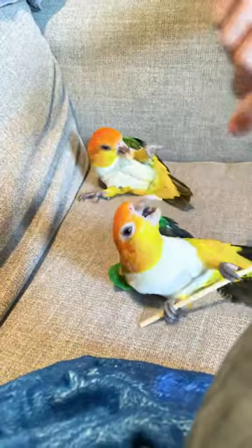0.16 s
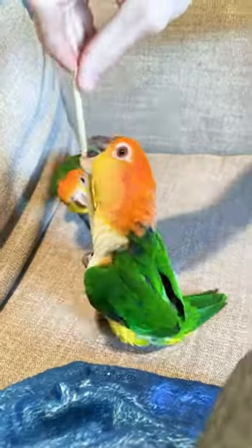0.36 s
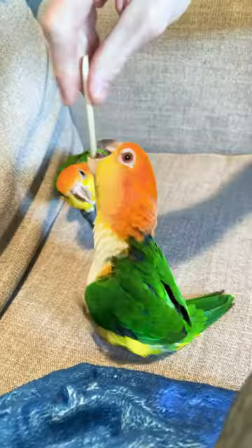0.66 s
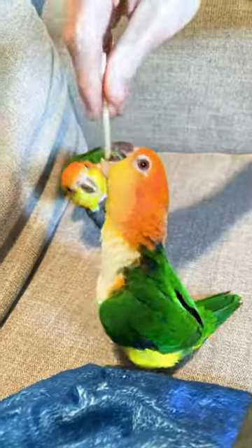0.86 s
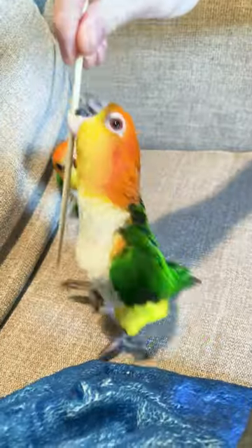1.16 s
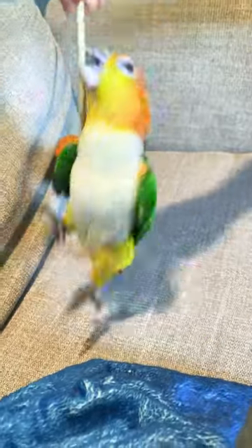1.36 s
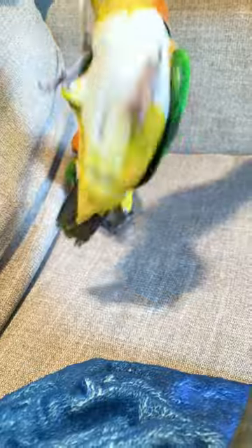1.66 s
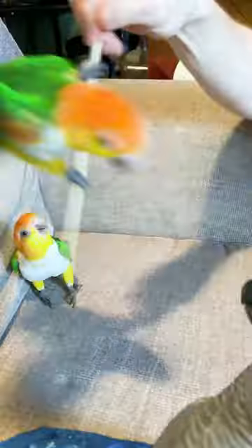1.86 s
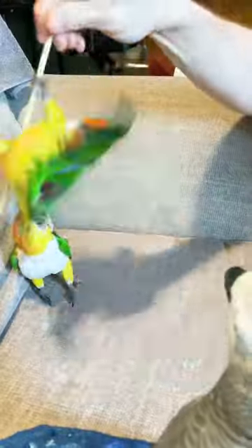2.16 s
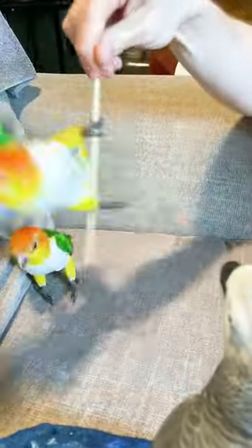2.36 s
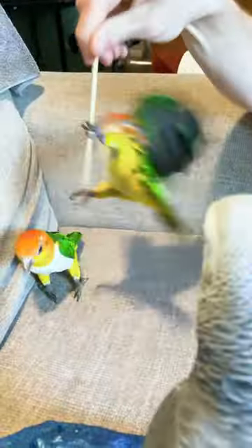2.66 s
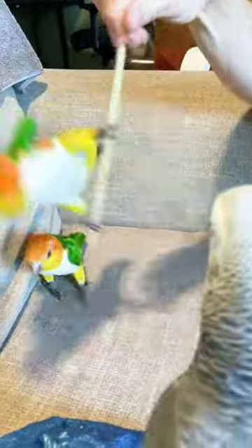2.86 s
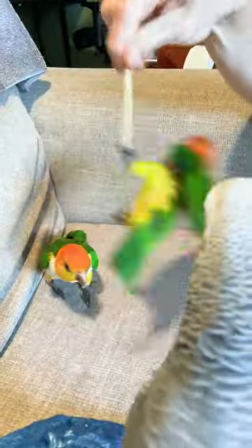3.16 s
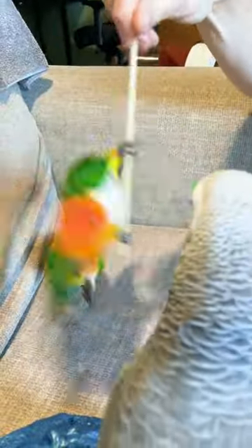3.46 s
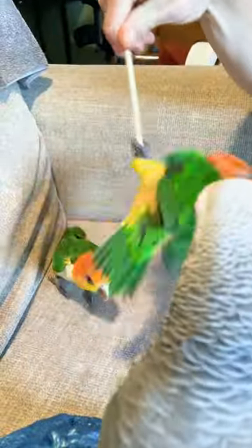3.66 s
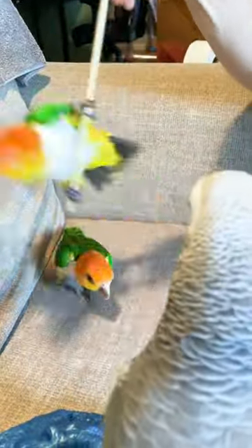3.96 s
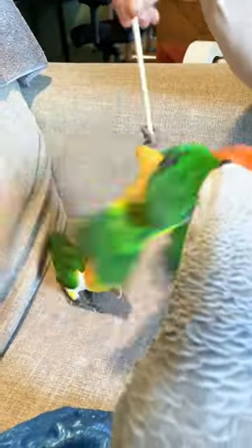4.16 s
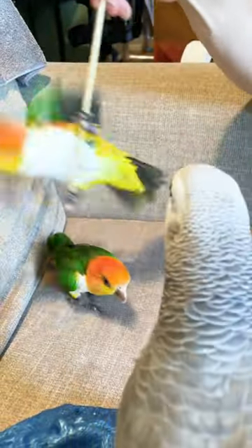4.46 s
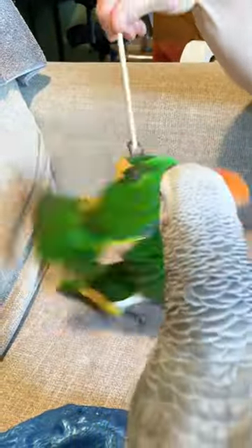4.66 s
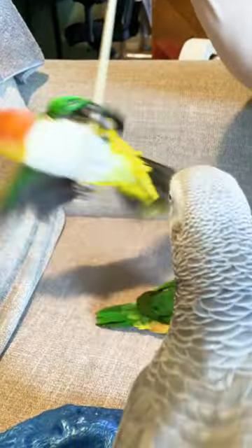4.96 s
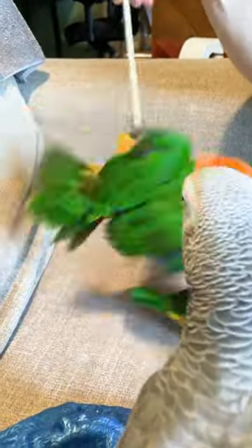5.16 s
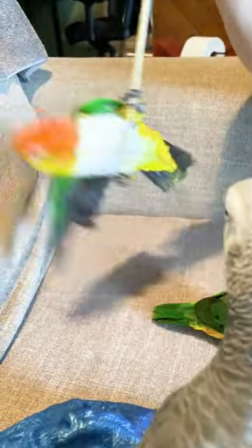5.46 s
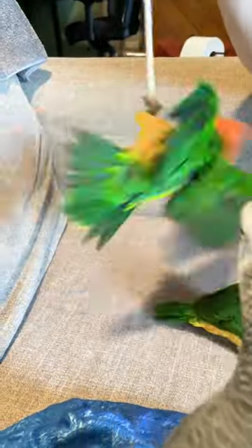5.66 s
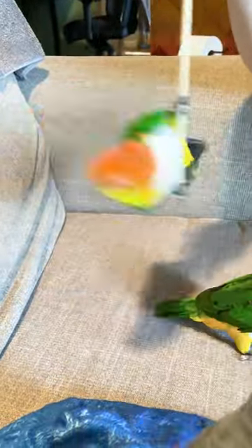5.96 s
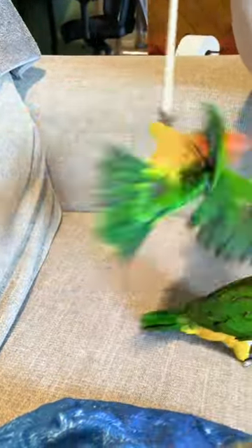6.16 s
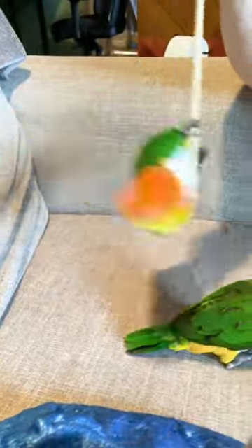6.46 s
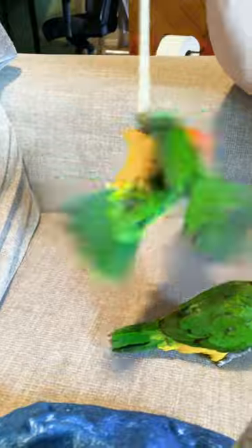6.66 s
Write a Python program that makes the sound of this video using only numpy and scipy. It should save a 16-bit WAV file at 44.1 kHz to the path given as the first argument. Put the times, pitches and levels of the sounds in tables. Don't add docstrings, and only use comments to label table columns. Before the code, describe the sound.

Close stereo pickup of a small parrot playing with a thin wooden stick on a cushioned sofa. Sparse rustles, a faint peep, claw scratches and tiny clicks come first. A hurried flurry of flapping follows, crowded with bright beak snaps, woody knocks, dull cushion thuds and wind buffeting. It thins into irregular feathery whooshes as the bird swings, with a few ticks, over quiet room hum and a very faint thin whine.

```python
import sys
import numpy as np
from scipy import signal
from scipy.fft import rfft, irfft, next_fast_len
from scipy.io import wavfile
from scipy.ndimage import uniform_filter1d

SR = 44100
rng = np.random.default_rng(int(sys.argv[2]) if len(sys.argv) > 2 else 0)


def master_out(mix):
    frames = np.transpose(np.atleast_2d(mix))
    ceiling = np.clip(frames, -1, 1)
    pcm = np.round(ceiling * 32767).astype(np.int16)
    wavfile.write(sys.argv[1], SR, pcm)


def nominal_scale(level):
    x = np.asarray(level, float) / 20
    return 10 ** x


N = 300762
T_S = np.arange(N) / SR
SIZE = next_fast_len(N + SR // 4)
BIN_HZ = np.maximum(np.arange(SIZE // 2 + 1) * SR / SIZE, 1)

# peak t/s, level/dB,
# swell/s, fade/s, dullness/dB
FIDGETS = [(.095, -60, 0.17, 0.086, 2), (.17, -74.5, 0.11, .1, 6), (.25, -70.5, 0.12, 0.012, 10),
           (.36, -76, 0.24, 0.44, -22), (0.498, -50.5, 0.0072, 0.0098, 3.5),
           (0.578, -63, 0.055, 0.073, 6.5), (.8, -76, 0.99, 0.72, -1), (.968, -62, 0.017, 0.081, -2),
           (1.058, -62.5, 0.031, 0.49, -7), (1.17, -82, .15, 0.15, 3), (1.3, -77, 0.18, .12, 8),
           (1.385, -68.5, 0.069, .03, 1), (1.592, -63.5, 0.024, 0.14, -1), (1.66, -70, .06, .04, 8),
           (1.72, -65, 0.059, 0.073, 2.5), (1.85, -68.5, .1, 0.07, 3), (4.861, -67.5, 0.43, 0.16, 1)]
# peak t/s, level/dB, swell/s, fade/s, dullness/dB
FLAPS = [(1.893, -48.5, 0.0065, 0.16, 2), (1.945, -41.5, 0.049, 0.062, 0.5), (2.035, -44, 0.11, 0.14, -1),
         (2.1, -45, 0.023, 0.21, 0.5), (2.195, -45, 0.02, 0.068, 5.5), (2.264, -42, 0.033, 0.024, 1),
         (2.3, -49, 0.14, 0.23, 2.5), (2.35, -53, .03, 0.088, 5), (2.425, -46, 0.037, 0.17, 0),
         (2.519, -42, 0.11, 0.13, 2), (2.6, -46.5, 0.07, 0.15, -2), (2.673, -47, 0.026, 0.028, 4),
         (2.735, -47.5, 0.08, 0.11, 1.5), (2.86, -54, 0.22, 0.09, 2.5), (2.945, -51, 0.064, 0.1, -2.5),
         (3.026, -49.5, 0.04, 0.06, 4), (3.09, -53, .1, 0.089, 0.5), (3.14, -65, .03, 0.068, -3)]
# peak t/s, level/dB, swell/s, fade/s, dullness/dB
SWINGS = [(3.324, -55, 0.024, 0.036, 6.5), (3.37, -55.5, 0.099, 0.19, 0.5), (3.5, -77.5, 0.053, 0.27, 13.5),
          (3.68, -68.5, 0.11, 0.26, 4), (3.875, -61.5, 0.086, 0.12, 1), (3.93, -58, 0.1, 0.34, 0.5),
          (4.033, -53.5, 0.028, 0.05, -4.5), (4.1, -63.5, 0.27, .15, 3), (4.155, -57.5, 0.046, 0.065, 0),
          (4.245, -60.5, 0.031, 0.12, 0.5), (4.285, -60.5, 0.094, 0.085, -2),
          (4.425, -51.5, 0.027, 0.2, -3), (4.496, -51.5, 0.094, 0.035, 4.5), (4.56, -63, 0.13, 0.083, 0),
          (4.605, -56, 0.038, .1, -16), (4.64, -55, 0.073, 0.091, 1.5), (4.746, -46.5, 0.079, 0.053, -6.5),
          (4.949, -50.5, 0.033, 0.1, 0), (5.0, -63, .06, 0.1, 2), (5.15, -58.5, 0.086, 0.1, 4.5),
          (5.185, -54.5, 0.061, 0.12, -2.5), (5.24, -55.5, 0.12, .05, -1.5),
          (5.355, -63.5, 0.077, 0.054, 2.5), (5.408, -61, 0.041, 0.05, 5), (5.5, -76, .15, .12, 2),
          (5.595, -58, 0.021, 0.076, 2), (5.662, -48.5, 0.083, 0.082, 0), (5.775, -56, 0.11, 0.096, 2),
          (6.083, -58.5, 0.032, 0.098, 7), (6.147, -47, 0.066, 0.098, -3), (6.281, -63, 0.47, 0.35, 2.5),
          (6.575, -62, 0.025, 0.13, 6), (6.646, -45, 0.071, 0.057, 0.5), (6.771, -49, 0.1, 0.074, 3),
          (6.82, -52, 0.021, 0.042, 7.5)]
# f/Hz, density/dB per Hz
FEATHER = [(900, -5), (1500, -4.5), (1950, -3.5), (2300, -5), (2800, -4), (3500, -4.5), (5000, -2),
           (6400, 1), (8000, 0.5), (10000, 8.5), (11300, 6), (12300, -5.5), (13500, 7.5), (15500, -25)]
# start t/s, end t/s, bright barbs level/dB, dull barbs level/dB
STROKES = [
    (1.069, 1.085, -46, -66),
    (2.007, 2.023, -38.5, -41),
    (2.229, 2.244, -28, -36.5),
    (2.311, 2.317, -37, -37),
    (2.319, 2.327, -25, -34.5),
    (2.436, 2.471, -39.5, -42.5),
    (2.828, 2.835, -28.5, -41.5),
    (3.386, 3.413, -46, -52),
    (3.937, 3.967, -45, -52.5),
    (6.728, 6.755, -40.5, -54),
]
# start t/s, end t/s, level/dB, start f/Hz, end f/Hz
WHISTLES = [
    (2.234, 2.244, -29.5, 2050, 2700),
    (2.316, 2.327, -27, 2140, 2820),
    (2.83, 2.833, -32, 2190, 2680),
]
# t/s, peak level/dB, T60/s
BEAK_CLICKS = [(.311, -55, 0.0083), (0.436, -54, .005), (0.56, -48, 0.03), (0.617, -56, .009),
               (.961, -50, .004), (0.9662, -35, 0.0033), (0.984, -48, 0.013), (1.051, -41.5, 0.0061),
               (1.064, -41, .006), (1.58, -55, 0.014), (1.602, -56, 0.0069), (1.82, -59, .01),
               (1.888, -33, 0.0071), (1.92, -32, .01), (1.9477, -41, .01), (2.017, -31, 0.0091),
               (2.0974, -44, .01), (2.198, -28.5, .006), (2.3332, -18.5, 0.0064), (2.3993, -17, 0.005),
               (2.4494, -27, 0.025), (2.613, -30, 0.0098), (2.6648, -31.5, 0.029), (2.713, -41, 0.011),
               (2.7344, -48, 0.016), (2.766, -31.5, 0.013), (2.841, -40, .005), (2.921, -45, .01),
               (2.94, -44, .01), (3.0267, -48, .01), (3.0635, -46, 0.0089), (3.127, -26.5, 0.0058),
               (3.317, -28, 0.0076), (3.847, -43, 0.0088), (3.879, -43.5, .008), (4.405, -45, 0.0088),
               (4.4243, -49, 0.0052), (4.467, -45, .01), (4.6204, -49, .011), (4.722, -46, 0.011),
               (4.9421, -54, .008), (4.9476, -43, 0.0071), (5.628, -44, 0.012), (5.6976, -46, 0.0098),
               (6.7315, -43, .008), (6.7461, -41, 0.0058), (6.751, -39, .011), (6.786, -32, 0.023),
               (6.8154, -35, 0.057)]
# t/s, peak level/dB, ring f/Hz
WOOD_TICKS = [(0.495, -45, 2410), (.966, -53, 4260), (.984, -50, 4270), (1.051, -57, 4000),
              (1.377, -44.5, 1510), (1.6147, -45.5, 8100), (1.686, -47, 1410), (1.6865, -50, 6500),
              (1.704, -34, 6900), (1.7046, -39.5, 2380), (1.821, -60, 2000), (2.188, -46, 2950),
              (2.191, -30, 3280), (2.1987, -30, 2480), (2.2452, -20.5, 3280), (2.401, -36, 6200),
              (2.523, -30.5, 2570), (3.393, -42.5, 6060), (3.404, -38, 6200), (3.952, -34, 6200),
              (4.601, -45, 7000), (4.609, -48, 6540), (4.634, -47, 1510), (4.642, -46, 1970),
              (4.708, -49, 2600), (4.724, -53, 1690), (5.6652, -38.5, 2300), (6.074, -47, 1800),
              (6.525, -61, 5730), (6.572, -52, 2600)]
# t/s, peak level/dB, ring f/Hz
KNOCKS = [(.44, -58, 300), (.5, -56, 300), (1.823, -52, 790), (1.828, -49, 460), (2.017, -52, 540),
          (2.199, -34, 1310), (2.23, -30, 2530), (1.646, -49.5, 1110), (2.447, -42, 710), (2.453, -55, 510),
          (2.46, -40, 705), (2.4675, -35, 1110), (2.47, -33, 442), (2.507, -40, 497), (2.522, -51, 496),
          (2.534, -32.5, 325), (2.548, -50, 603), (2.588, -44, 400), (2.607, -41, 348), (2.665, -34.5, 730),
          (2.676, -41, 470), (2.687, -42, 380), (2.734, -45, 2070), (3.388, -53, 1410), (3.955, -49, 1050),
          (3.961, -47, 1090), (4.041, -43.5, 660), (4.046, -45, 328), (4.479, -50, 1090),
          (4.643, -38.5, 496), (4.71, -48, 480), (4.7245, -32.5, 600), (4.727, -44, 560), (4.771, -42, 418),
          (4.925, -67, 890), (5.666, -46, 448)]
# t/s, peak level/dB, ring f/Hz, initial pitch excess/share
THUDS = [(0.437, -36, 84, 1.6), (0.499, -33, 77, 1.46), (1.07, -38.5, 188, 0.23), (1.828, -44.5, 110, 0.47),
         (1.892, -30.5, 54.5, .1), (1.907, -39, 44.7, .3), (1.93, -33, 60.4, 0.086), (2.016, -37, 65.6, .1),
         (2.102, -37, 55, 0.087), (2.197, -38.5, 85, 0.3), (2.235, -37.5, 255, 0.28),
         (2.248, -38, 55, 0.27), (2.326, -31, 80.6, 0.48), (2.451, -35, 220, 0.36),
         (2.469, -27, 72.4, 0.45), (2.4787, -36, 72, .1), (2.494, -35, 70.6, .1), (2.508, -37.5, 170, .3),
         (2.523, -35, 55.6, 0.4), (2.541, -36, 148, 0.42), (2.559, -46, 201, .3), (2.577, -39.5, 118, 0.25),
         (2.625, -47, 160, 0.37), (2.604, -42.5, 64, 0.64), (2.834, -35.5, 106, 0.66),
         (2.954, -34.5, 54, .1), (4.049, -40, 80, 1.35), (4.646, -38.5, 110, 1.2), (4.728, -39, 104, 0.96),
         (4.786, -38.5, 80.5, .1), (6.81, -41.5, 80.5, .3)]
# start t/s, end t/s, level/dB, centre f/Hz
SCRATCHES = [
    (0.557, 0.57, -51.5, 9450),
    (0.609, 0.624, -53.5, 9800),
    (1.065, 1.078, -37, 11000),
    (1.582, 1.595, -53.5, 9600),
    (1.59, 1.688, -60, 8600),
    (2.39, 2.42, -39, 10900),
]
# t/s, f/Hz, level/dB
PEEP = [(.068, 1433, -90), (.08, 1420, -62), (.1, 1386, -52), (.109, 1380, -58), (.122, 1320, -51),
        (.138, 1270, -55), (.146, 1270, -70)]
# peak t/s, gust level/dB, cloth flap level/dB, fade/s
PUSHES = [(.25, -47, -75, 0.41), (0.512, -48, -72, 0.03), (1.098, -47.5, -67, 0.17),
          (1.827, -67, -62.5, 0.046), (1.911, -40.5, -62, 0.13), (2.033, -32.5, -55, 0.073),
          (2.125, -31.5, -49, 0.051), (2.244, -32.5, -49, 0.045), (2.33, -37.5, -50, 0.023),
          (2.462, -51, -41, 0.04), (2.484, -37, -56, 0.086), (2.534, -38, -50, 0.085),
          (2.612, -34, -56, 0.021), (2.709, -44.5, -61, 0.23), (3.033, -41.5, -62, 0.25),
          (4.08, -46.5, -71.5, 0.28), (4.649, -66, -65, 0.72), (4.749, -39, -65, 0.09),
          (5.248, -49, -66, 0.4), (5.676, -52.5, -85, 0.24), (6.146, -55.5, -76, 0.62),
          (6.65, -51, -73, 0.25)]
# t/s, buffet level/dB, flutter level/dB
CROSSWIND = [(2.635, -75, -77), (2.652, -40, -44), (2.668, -45, -54), (2.685, -42, -45), (2.715, -37, -74),
             (2.8, -55, -70), (2.9, -81, -80), (3.1, -94, -92)]
# f/Hz, density/dB per Hz
ROOM = [(20, -12), (45, -2), (85, 3), (160, -5), (300, -9.5), (600, -21), (1200, -28.5), (1900, -40),
        (4000, -47.5), (9000, -54.5), (11000, -48), (12500, -50), (14500, -41)]
# f/Hz, width/Hz, level/dB
HUM = [
    (72, 69, -65.5),
    (218, 13, -59.5),
    (356, 6, -70),
]
FAR_RUSTLE = 5.93, .14, -76
# f/Hz, lead/rad
PORT_LEAD = [(1500, 0), (3000, .25), (4100, .9), (4800, 2.9), (5400, 5.4), (5800, 6.2), (6200, 6.4),
             (8400, 9.2), (8800, 9.42), (9700, 9.45), (11900, 12.57), (20000, 12.57)]
# f/Hz, level/dB
PORT_TILT = [(60, 1.1), (500, 2.2), (1200, -.5), (1800, 0), (2500, 2), (3300, 0), (4700, -3.5), (5700, 0),
             (14000, 0)]
# f/Hz, scattered level/dB
NEAR_SCATTER = [(100, -20), (300, -12), (700, -4), (1400, -18), (1900, -24), (2700, -7), (4100, -5),
                (4900, -3), (5950, -22), (7000, -7), (8100, -8), (8700, -13), (9600, -15), (10300, -12),
                (11500, -10), (12100, -17)]
# f/Hz, scattered level/dB
SIDE_SCATTER = [(100, -12), (800, -7), (1900, -22), (4800, -7), (5950, -20), (8000, -9), (9300, -17),
                (11000, -11), (13000, -16)]
# f/Hz, scattered level/dB
ROOM_SCATTER = [(100, -13), (300, -10), (800, -1), (1400, -2), (1850, -8), (3000, -2), (5000, -3),
                (5950, -16), (7500, -6), (8700, -16), (9600, -18), (10500, -10), (12100, -30)]
# f/Hz, level/dB
MICROPHONE = [(9000, -2), (11600, -3), (12400, -9.5), (13400, -17), (14500, -41), (16000, -26)]
# treble level/dB, top f/Hz
KEPT_TOP = [(-80, 13500), (-68, 11800), (-56, 12000), (-46, 13400), (-38, 14600)]

SWELL_BEND, FADE_BEND, SETTLED_DB = 1.39, 1.034, -90.5
SAG_CYCLES = 0.62
STICK_OVERTONE = 2.82


def rms_one(x):
    return x / np.sqrt(np.mean(x ** 2) + 1e-20)


def in_time(rows):
    s, *columns = np.transpose(rows)
    return [np.interp(T_S, s, c) for c in columns]


def at_hz(points):
    hz, value = np.transpose(points)
    return np.interp(np.log(BIN_HZ), np.log(np.maximum(hz, 1)), value)


def colour(x, gain):
    return irfft(rfft(x, SIZE) * gain, SIZE)[..., :N]


def band(x, low_hz, high_hz):
    return signal.sosfilt(signal.butter(2, [low_hz, high_hz], "band", fs=SR, output="sos"), x)


def drift(rate_hz):
    r = np.exp(-80 * np.pi * rate_hz / SR)
    slow = signal.lfilter([1], [1, -2 * r, r * r], rng.standard_normal(N // 40 + 2002))[2000:]
    return np.interp(np.arange(N) / 40, np.arange(len(slow)), rms_one(slow))


def above(level_db, floor_db):
    return np.sqrt(np.maximum(nominal_scale(level_db) ** 2 - nominal_scale(floor_db) ** 2, 0))


def movements(peak_s, level_db, swell_s, fade_s, rest_db):
    late_s = T_S[::64] - peak_s[:, None]
    swelling = np.abs(late_s / swell_s[:, None]) ** SWELL_BEND
    fading = np.abs(late_s / fade_s[:, None]) ** FADE_BEND
    loss_db = 20 * np.where(late_s < 0, swelling, fading)
    power = np.sum(nominal_scale(level_db[:, None] - loss_db) ** 2, axis=0) + nominal_scale(rest_db) ** 2
    return np.interp(T_S, T_S[::64], 10 * np.log10(power))


def swell(start_s, end_s):
    span = slice(round(start_s * SR), round((end_s + 0.025) * SR))
    along = np.abs(T_S[span] - start_s) / (end_s - start_s)
    return span, along, np.where(along < 1, np.sqrt(along), np.exp((end_s - T_S[span]) / 0.001))


def rough_grains(spread_db):
    return nominal_scale(spread_db * np.minimum(rng.exponential(1, N), 6)) * rng.standard_normal(N)


def barbs(spread_db):
    grains = rough_grains(spread_db)
    low_share = 1 / (1 + (BIN_HZ / 3900) ** 6)
    dull, bright = colour(grains, nominal_scale(at_hz(FEATHER)) * np.array([low_share, 1 - low_share]))
    return rms_one(dull), rms_one(bright)


def rustle():
    s, db, swell_s, fade_s, dull_db = np.transpose(FIDGETS + FLAPS + SWINGS)
    dull, bright = barbs(spread_db=2.5)
    flicker_db = 1.05 * drift(36)
    low_db = movements(s, db + dull_db, swell_s, fade_s, SETTLED_DB) - 8.5
    low = dull * above(low_db, -101.0) * nominal_scale(1.86 * drift(26.0))
    low = low + nominal_scale(-7.0 + 3.4 * drift(7.0)) * band(low, 2070, 3010)
    high_db = movements(s, db, swell_s, fade_s, SETTLED_DB) + 0.54
    high = bright * above(high_db, -89.0) * nominal_scale(2.0 * drift(24))
    catches = (rng.random(N) < 45.0 / SR) * rng.exponential(1, N)
    crackle = 1 + nominal_scale(-1.5) * signal.lfilter([1], [1, -nominal_scale(-60 / (0.0094 * SR))], catches)
    return nominal_scale(flicker_db) * crackle * (low + high)


def strokes():
    out = np.zeros(N)
    dull, bright = barbs(spread_db=2.4)
    waver = drift(300)
    for start_s, end_s, bright_db, dull_db in STROKES:
        span, along, shape = swell(start_s, end_s)
        out[span] += shape * (nominal_scale(bright_db) * bright[span] + nominal_scale(dull_db) * dull[span])
    for start_s, end_s, level_db, from_hz, to_hz in WHISTLES:
        span, along, shape = swell(start_s, end_s)
        hz = from_hz + (to_hz - from_hz) * np.minimum(along, 1.1) ** 2
        phase = 2 * np.pi * np.cumsum(hz) / SR
        tone = np.sin(phase) + .2 * np.sin(3 * phase)
        out[span] += shape * nominal_scale(level_db + 2.5 * waver[span]) * tone
    return out


def blows(table, crack_db, push_ms, rough, overtone_db=-99):
    out, t = np.zeros(N + SR), np.arange(SR // 3) / SR
    noise = rng.standard_normal((len(table), len(t)))
    for (s, level_db, hz, t60_s, sag), grit in zip(table, noise):
        fall = nominal_scale(-60 * t / t60_s) * (1 - np.exp(-1000 * t / push_ms))
        cycles = hz * t + sag * SAG_CYCLES * (1 - np.exp(-hz * t / SAG_CYCLES))
        upper = nominal_scale(overtone_db) * fall * np.sin(2 * np.pi * STICK_OVERTONE * cycles)
        grain = rough * rms_one(band(grit, hz * .6, min(hz * 1.6, 19000)))
        mode = np.sin(2 * np.pi * cycles) + upper + grain
        crack = nominal_scale(crack_db) * band(grit * fall ** 2.46, max(hz * 0.45, 900), 22000)
        out[round(s * SR):][:len(t)] += nominal_scale(level_db) * (fall * mode / fall.max() + crack)
    return out[:N]


def beak_clicks():
    table = [(s, db, 11170 + 1010 * rng.standard_normal(), t60_s, 0) for s, db, t60_s in BEAK_CLICKS]
    return nominal_scale(-2.5) * blows(table, crack_db=3.0, push_ms=0.053, rough=0.39)


def wood_ticks():
    table = [(*row, 0.0071, 0) for row in WOOD_TICKS]
    return nominal_scale(-7.0) * blows(table, crack_db=9.0, push_ms=0.05, rough=1.3)


def stick_knocks():
    table = [(*row, 0.019, 0.19) for row in KNOCKS]
    return blows(table, crack_db=-2.5, push_ms=0.14, rough=0.43, overtone_db=-10)


def soft_thuds():
    table = [(s, db, hz, 12 / hz, sag) for s, db, hz, sag in THUDS]
    return blows(table, crack_db=-42.0, push_ms=0.83, rough=0.41)


def scratches():
    out = np.zeros(N)
    grains = rough_grains(spread_db=4.9)
    for start_s, end_s, level_db, hz in SCRATCHES:
        span, along, shape = swell(start_s, end_s)
        out[span] += nominal_scale(level_db) * shape * rms_one(band(grains[span], hz * .84, hz * 1.16))
    return out


def peep():
    hz, level_db = in_time(PEEP)
    level = nominal_scale(level_db - 6 + 3 * drift(65))
    return level * np.sin(2 * np.pi * np.cumsum(hz + 35 * drift(130)) / SR) * (T_S < .15)


def gusts():
    s, gust_db, flap_db, fade_s = np.transpose(PUSHES)
    swell_s = 0.73 * fade_s
    gust_db = movements(s, gust_db, swell_s, fade_s, rest_db=-53)
    flap_db = movements(s, flap_db, swell_s, fade_s, rest_db=-67.5)
    buffet_db, flutter_db = in_time(CROSSWIND)
    shared, own = rng.standard_normal((2, 2, N))
    lumps = rms_one(band(band(shared[0] + .3 * own, 22, 330), 35, 105))
    lumps = lumps * above(gust_db - 2.5, -54.0) * nominal_scale(1.5 * drift(12))
    flap = rms_one(band(shared[1] + .5 * own[::-1], 170, 950))
    flap = flap * above(flap_db + 1.5, -66.0) * nominal_scale(2.5 * drift(35))
    buffet = rms_one(band(own[0, ::-1], 27, 135)) * nominal_scale(buffet_db)
    buffet = buffet + rms_one(band(own[1, ::-1], 200, 570)) * nominal_scale(flutter_db)
    return lumps + flap + buffet * (T_S > CROSSWIND[0][0]) * [[1.2], [-.8]]


def motor_hum():
    out = np.zeros(N)
    for hz, width_hz, db in HUM:
        resonance = 1 / (1 + (2 * (BIN_HZ - hz) / width_hz) ** 2)
        out += nominal_scale(db) * rms_one(colour(rng.standard_normal(N), resonance))
    return out


def room():
    air = nominal_scale(-52) * rms_one(colour(rng.standard_normal(N), nominal_scale(at_hz(ROOM))))
    phase = 2 * np.pi * np.cumsum(1185 + 6 * drift(12)) / SR
    whine = nominal_scale(-75) * np.sin(phase) * np.clip((T_S - 2.75) / .2, 0, 1)
    centre_s, half_s, level_db = FAR_RUSTLE
    far = rms_one(band(rng.standard_normal(N), 2100, 2900)) * np.exp(-((T_S - centre_s) / half_s) ** 4)
    return air + motor_hum() + whine + nominal_scale(level_db) * far


def ports(x, scatter, t60_s):
    t = np.arange(SR // 5) / SR
    echoes = rng.standard_normal((3, len(t))) * nominal_scale(-60 * t / t60_s)
    echoes = echoes / np.linalg.norm(echoes, axis=1)[:, None]
    shares = np.array([drift(5) for _ in echoes])
    shares = shares / np.linalg.norm(shares, axis=0)
    paths = rfft(x * shares, SIZE) * rfft(echoes, SIZE)
    direct = rfft(x, SIZE)
    diffuse = paths.sum(axis=0) * nominal_scale(at_hz(scatter))
    left = np.exp(.5j * at_hz(PORT_LEAD)) * nominal_scale(.5 * at_hz(PORT_TILT))
    return irfft(np.array([left * (direct + diffuse), (direct - diffuse) / left]), SIZE)[:, :N]


def scene():
    wings = ports(rustle() + strokes() + soft_thuds() + peep(), NEAR_SCATTER, t60_s=0.074)
    ticks = beak_clicks() + wood_ticks()
    contacts = ports(ticks + stick_knocks() + scratches(), SIDE_SCATTER, t60_s=0.046)
    return wings + contacts + ports(room(), ROOM_SCATTER, t60_s=0.72) + gusts() * nominal_scale([[.4], [-.4]])


def ragged_top(x):
    pair = np.array([[1, 1], [1, -1]])
    hz, s, frames = signal.stft(pair @ x / 2, SR, nperseg=1024, noverlap=512)
    treble = np.sum(np.abs(frames[:, hz > 4000]) ** 2, axis=(0, 1))
    level_db = 10 * np.log10(2 * treble + 1e-12)
    edge = uniform_filter1d(band(x[0], 9800, 13000) ** 2, size=40)
    blocks = np.pad(edge, (256, 512 * len(s)))[:512 * len(s)].reshape(len(s), 512)
    clicky = blocks.max(axis=1) > 15 * np.median(blocks, axis=1)
    sudden = (np.diff(level_db, prepend=0) > 6.5) + 2. * (clicky & (level_db > -58))
    chance_hz = np.repeat(rng.normal(0, 350, (2, len(s))), 2, axis=1)[:, :len(s)]
    top_hz = np.interp(uniform_filter1d(level_db, size=3), *np.transpose(KEPT_TOP))
    top_hz = top_hz + chance_hz[0] + 1300 * sudden
    frames = frames * (hz[:, None] < np.round(top_hz / 350) * 350)
    gap_hz = np.round((8400 + chance_hz[1]) / 350) * 350 + 1500 * sudden
    frames[0] *= (hz[:, None] < gap_hz) | (hz[:, None] > 9750)
    return pair @ signal.istft(frames, SR, nperseg=1024, noverlap=512)[1][:, :N]


def low_pass(x):
    return signal.sosfilt(signal.butter(12, 15800, fs=SR, output="sos"), x)


def record(dry):
    mix = ragged_top(colour(dry, nominal_scale(at_hz(MICROPHONE))))
    return low_pass(mix)


dry = scene()
out = record(dry)
master_out(out)
```